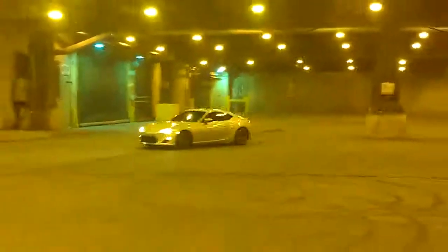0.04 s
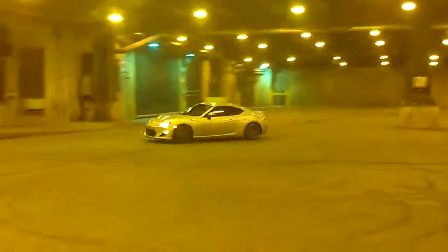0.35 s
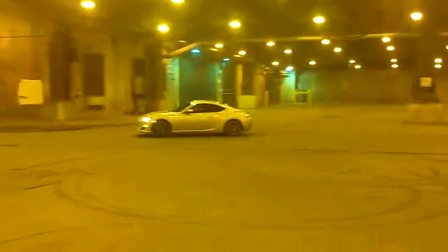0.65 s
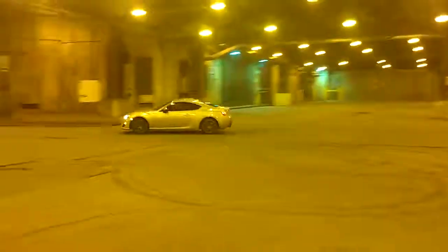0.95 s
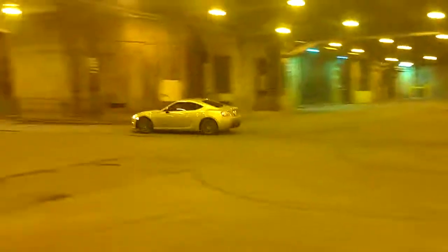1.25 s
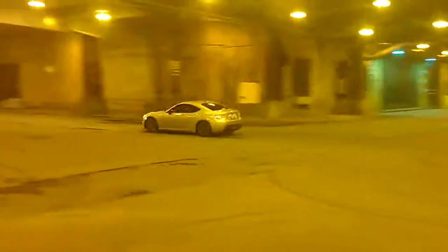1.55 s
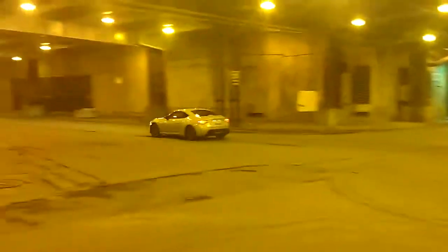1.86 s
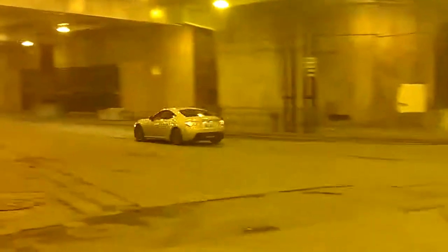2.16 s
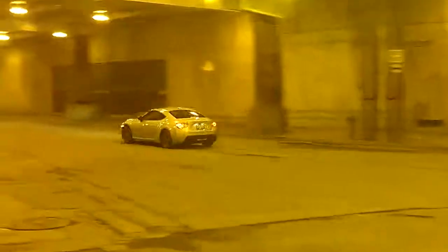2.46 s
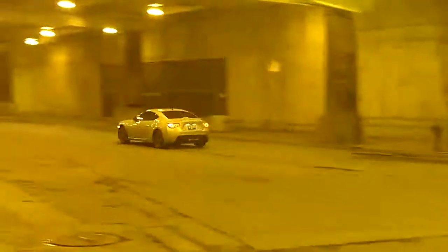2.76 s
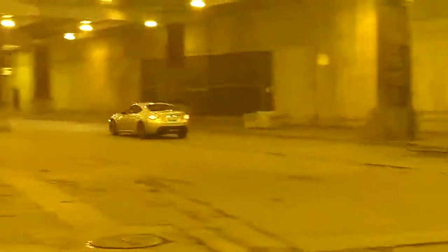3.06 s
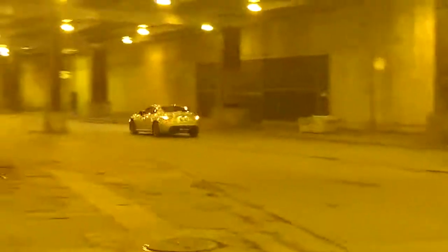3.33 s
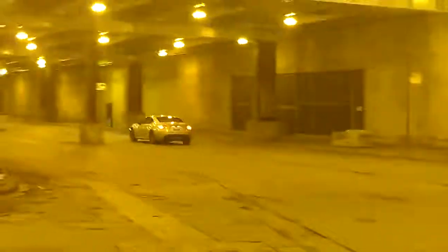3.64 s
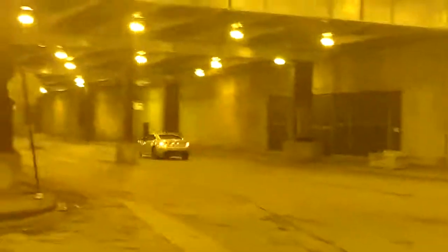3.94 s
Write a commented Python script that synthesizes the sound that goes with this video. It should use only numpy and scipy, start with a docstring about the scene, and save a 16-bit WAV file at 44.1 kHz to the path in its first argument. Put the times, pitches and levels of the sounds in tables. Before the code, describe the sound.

Echoing tyre squeal as a car drifts round and pulls away, its engine droning.

```python
"""A covered concrete street: a car drifts round and pulls away. The sliding tyres squeal in stick-slip
near 1 kHz, smeared into a band by the long echo, over the engine's firing drone and throbbing roar.
Twice a tyre bites hard, with a cluster of chirps and a faint bump. After the second bite the level
dips and a thinner, higher squeal goes on."""
import sys
import numpy as np
from scipy import signal
from scipy.fft import rfft, irfft, next_fast_len
from scipy.io import wavfile
from scipy.ndimage import uniform_filter1d, map_coordinates

SR = 44100
rng = np.random.default_rng(int(sys.argv[2]) if len(sys.argv) > 2 else 0)


def bounce(signal):
    """Save signal as a 16-bit WAV file at the path given by the first command-line argument."""
    frames = np.transpose(np.atleast_2d(signal))
    limited = np.clip(frames, -1, 1)
    pcm = np.round(limited * 32767).astype(np.int16)
    wavfile.write(sys.argv[1], SR, pcm)


N = 176400
LEAD_S = 1  # head start that fills the echo
JITTER_KNOTS_HZ = 260

# Street echo. Each row: frequency in Hz, time to decay 60 dB in seconds.
STREET_T60_S = [(150, 1), (1000, 2.82), (3000, 1.8), (8000, 0.49)]
# Engine loudness. Each row: time in seconds, relative level in dB.
ENGINE_DB = [(0.0, -53.5), (0.8, -43), (1.2, -50), (1.43, -43.5), (1.65, -46.5), (1.79, -41), (2.12, -36),
             (2.27, -49), (2.32, -41.5), (2.81, -40), (2.86, -32.5), (2.92, -38.5), (3.35, -31.5),
             (3.75, -31), (3.81, -57), (4.0, -41)]
# Engine speed. Each row: time in seconds, firing rate in Hz.
FIRING_HZ = [(0, 101.5), (.5, 108), (1.0, 119), (1.45, 109.7), (1.8, 102.4), (2.0, 111.7), (2.55, 118.5),
             (4, 119.4)]
# Exhaust tones. Each row: multiple of the firing rate, relative level in dB.
EXHAUST_ORDERS = [(1, -32.5), (2, -5), (3, -7), (4, -9), (5, -5), (6, 5.5), (7, 4)]
# Swells of the third exhaust tone. Each row: peak time in seconds, level in dB.
EXHAUST_BOOMS = [(2.57, -49.5), (2.85, -38.5), (3.34, -36), (3.6, -40.5)]
# Low thuds. Each row: peak time in seconds, rise and fall in seconds, level in dB.
THUDS = [(2.126, .02, -71.5), (3.768, .009, -33)]
# Noise spectra. Each row: frequency in Hz, relative density in dB.
ROAR_SPECTRUM = [(60, -63.5), (130, -41.5), (190, -17.5), (230, -16.5), (290, -4.5), (350, -1), (420, -6.5),
                 (540, -2.5), (700, 7), (900, 5.5), (1150, 10.5), (1400, -7), (1900, -1), (2800, -16.5),
                 (5000, -73)]
THUD_SPECTRUM = [(25, -5.5), (120, 8.5), (250, 4.5), (600, -42.5)]
SCRUB_SPECTRUM = [(200, -43.5), (600, -19.5), (850, 9.5), (1500, 3.5), (2400, 4), (2900, -5), (4400, -8),
                  (5200, -26.5), (6200, -53)]
RASP_SPECTRUM = [(150, -37.5), (400, -3.5), (750, 10.5), (1500, 7.5), (3500, 1), (7000, -9), (9500, -24.5)]
GRIT_SPECTRUM = [(2000, -25), (3800, 0.5), (7000, -15.5)]
# Last thin squeal. Each row: time in seconds, fundamental in dB, second harmonic in dB.
WHINE_DB = [(3.785, -31, -31.5), (3.815, -69, -43), (3.839, -51, -40), (3.875, -29, -29), (3.927, -27, -34),
            (3.987, -24.5, -26), (4.0, -23.5, -33)]
# Tread judder. Each row: time in seconds, level in dB.
JUDDER_DB = [(0, -54), (.06, -43.5), (.28, -39), (.32, -61), (.37, -39.5), (.62, -63), (.79, -40),
             (.86, -47), (1.08, -45.5), (1.34, -42.5), (1.75, -77.5)]
# Hardest single slips. Each row: peak time in seconds, pitch in Hz, level in dB.
TREAD_YIPS = [(.119, 1080, -37), (0.23, 1104, -40), (1.077, 1125, -36.5), (1.335, 1115, -33.5),
              (3.885, 1204, -41)]
# Tyre overtones. Each row: multiple of the pitch, relative level in dB.
JUDDER_HARMONICS = [(3, 2), (4, -1), (5, -10.5), (6, -14.5)]
CHIRP_HARMONICS = [(3, -7), (4, -12.5)]
SQUEAL_HARMONICS = [(3, 11.5), (4, 6.5), (5, -22)]
# Tyre bites. Each row: peak time in seconds, pitch in Hz, rise and fall in seconds,
# fundamental, second harmonic and rasp in dB, rasp cutoff in Hz.
BITES = [(2.084, 930, .007, .012, -17.5, -18, -40.5, 4340),
         (2.117, 1008, 0.014, 0.012, -14.5, -13.5, -23.5, 4920),
         (2.137, 1006, .005, 0.024, -15, -17.5, -27, 4500),
         (2.297, 1123, .006, 0.0089, -29, -28.5, -46, 4500),
         (2.337, 1002, 0.0071, .016, -14.5, -30.5, -36, 4400),
         (2.603, 1028, 0.014, 0.014, -11.5, -35.5, -41, 3503),
         (3.755, 1225, 0.0088, 0.0059, -13.5, -9, -20.5, 9200),
         (3.768, 1176, 0.0042, 0.0082, -11.5, -18, -19.5, 9300)]
# Sliding tyres. Each row: ratio to the common pitch, relative level in dB.
TYRE_VOICES = [(1.0, -1), (1.07, -5.5), (.93, -7.5)]
# Squeal pitch. Each row: time in seconds, second harmonic in Hz.
SQUEAL_OCTAVE_HZ = [(0, 2137), (.3, 2164), (.37, 1979), (.55, 2030), (.74, 2271), (.91, 2250), (.96, 2067),
                    (1.08, 2285), (1.3, 2247), (1.58, 2124), (1.74, 1897), (2.0, 1849), (2.27, 2091),
                    (3.7, 2123)]
# Squeal fundamental. Each row: time in seconds, relative level in dB.
SQUEAL_DB = [(0.0, -32.5), (0.11, -25), (0.23, -25), (0.26, -20), (0.31, -27.5), (0.42, -21.5),
             (0.51, -28.5), (0.56, -20), (0.68, -24.5), (0.8, -19), (0.84, -23.5), (0.99, -20.5),
             (1.14, -29.5), (1.31, -23), (1.62, -21), (1.7, -25), (1.78, -20.5), (2.0, -21.5), (2.17, -25),
             (2.27, -34.5), (2.37, -27.5), (2.57, -23), (2.66, -27.5), (2.82, -30.5), (2.84, -19),
             (2.99, -29), (3.02, -19), (3.11, -28.5), (3.16, -21.5), (3.58, -31), (3.63, -17), (3.72, -46)]
# Squeal brightness. Each row: time in seconds, second harmonic and treble in relative dB.
SQUEAL_EDGE_DB = [(0.0, -33.5, -47), (0.13, -26.5, -43.5), (0.69, -30.5, -42), (0.77, -26.5, -35.5),
                  (0.85, -30.5, -44), (0.96, -31, -37.5), (1.17, -34, -46), (1.31, -31.5, -42.5),
                  (1.63, -31.5, -43.5), (1.7, -37, -50.5), (1.78, -31.5, -45.5), (2.04, -39, -47.5),
                  (2.24, -36, -47.5), (2.5, -41, -54), (2.596, -36, -49.5), (2.648, -46.5, -59),
                  (2.89, -35.5, -47.5), (2.936, -43.5, -53.5), (3.092, -42.5, -48.5), (3.596, -45.5, -41.5),
                  (3.72, -51, -43.5)]


def amp(db):
    """Decibels to gain."""
    return 10 ** (np.asarray(db) / 20)


def unit(x):
    """Scale to rms 1."""
    return x / np.sqrt(np.mean(x ** 2) + 1e-20)


def along(points, hz):
    """Interpolate (Hz, value) points on a log axis."""
    knots_hz, values = np.transpose(points)
    return np.interp(np.log(hz + 1), np.log(knots_hz + 1), values)


def clock(lead_s=0):
    """Sample times in seconds, from -lead_s."""
    return np.arange(-lead_s * SR, N) / SR


def curves(rows, lead_s=0):
    """One value per sample for each column after the time."""
    times_s, *columns = np.transpose(rows)
    return [np.interp(clock(lead_s), times_s, column) for column in columns]


def wobble(knots_hz, size=N):
    """Smooth random curve."""
    return map_coordinates(rng.standard_normal(8192), [np.arange(size) * knots_hz / SR + 2], mode="mirror")


def swell(peak_s, rise_s, fall_s):
    """Rounded peak with exponential flanks."""
    t = clock() - peak_s
    return np.exp(1 - np.hypot(1, np.pi / 2 * t / np.where(t < 0, rise_s, fall_s)))


def filtered(x, response):
    """Apply a gain given as a function of Hz."""
    size = next_fast_len(N + SR // 2)
    return irfft(rfft(x, size) * response(np.fft.rfftfreq(size, 1 / SR)), size)[:N]


def lowpass(cutoff_hz, order):
    """Butterworth gain as a function of Hz."""
    return lambda hz: 1 / np.hypot(1, (hz / cutoff_hz) ** order)


def noise(spectrum):
    """Coloured noise of rms 1."""
    return unit(filtered(rng.standard_normal(N), lambda hz: amp(along(spectrum, hz))))


def cycle(hz, jitter, knots_hz=JITTER_KNOTS_HZ):
    """Phase of an oscillation whose pitch trembles by the fraction jitter."""
    return 2 * np.pi * np.cumsum(hz * (1 + jitter * wobble(knots_hz, len(hz)))) / SR


def tones(rows, phase):
    """Harmonics of one oscillation from (multiple, dB rms) rows."""
    return np.sqrt(2) * sum(amp(db) * np.sin(round(k) * phase) for k, db in rows)


def echo(x):
    """Concrete reverberation, longest near 1 kHz, shortest in the treble."""
    hz, t, spectra = signal.stft(rng.standard_normal(SR * 3 // 2), SR, nperseg=256)
    decay = np.exp(-np.log(1000) * t / along(STREET_T60_S, hz)[:, None])
    tail = signal.istft(spectra * decay, SR, nperseg=256)[1]
    return signal.fftconvolve(x, tail / np.linalg.norm(tail))[:len(x)]


def distant(x, direct_db):
    """Echo plus weaker direct sound, held at rms 1."""
    mix = unit(echo(x)) + amp(direct_db) * unit(x)
    power = np.abs(uniform_filter1d(mix * mix, size=4000))
    return (mix / np.sqrt(power + 1e-9))[-N:]


def engine():
    """Uneven firing drives exhaust tones and a throbbing roar; under load the tones gain and boom."""
    throttle_s, throttle_rise_s, load_db = 2.39, 0.89, 3
    level_db, = curves(ENGINE_DB)
    firing_hz, = curves(FIRING_HZ, LEAD_S)
    load = np.clip((clock() - throttle_s) / throttle_rise_s, 0, 1)
    phase = cycle(firing_hz, jitter=0.0279, knots_hz=30)
    drone = amp(-4 + load_db * load) * distant(tones(EXHAUST_ORDERS, phase), direct_db=-6.5)
    throb = 1 + 0.21 * np.sin(phase[-N:])
    roar = amp(9) * unit(noise(ROAR_SPECTRUM) * throb)
    boom = sum(amp(db) * swell(s, rise_s=.047, fall_s=.047) for s, db in EXHAUST_BOOMS)
    return amp(level_db) * (drone + roar) + boom * unit(np.sin(3 * phase[-N:]))


def bumps():
    """Low thud under the hardest bites."""
    return sum(amp(db) * swell(s, flank_s, flank_s) for s, flank_s, db in THUDS) * noise(THUD_SPECTRUM)


def whine():
    """One tyre sings on at a higher, steadier pitch."""
    start_s, rise_s, pitch_hz = 3.77, 0.0047, 1245
    first_db, second_db = curves(WHINE_DB)
    phase = cycle(np.full(N + LEAD_S * SR, pitch_hz), jitter=0.041)
    levels_db = [first_db, second_db, second_db - 17.5, second_db - 34]
    tone = sum(amp(db) * distant(np.sin(k * phase), direct_db=-2.5) for k, db in enumerate(levels_db, 1))
    scrub = amp(second_db - 9.5) * noise(SCRUB_SPECTRUM)
    return np.clip((clock() - start_s) / rise_s, 0, 1) * (tone + scrub)


def judder():
    """The tread lets go in quick uneven slips that ring on the squeal's overtones; a few yip out."""
    slip_hz, sharpness = 60, 0.9
    level_db, = curves(JUDDER_DB)
    octave_hz, = curves(SQUEAL_OCTAVE_HZ)
    grit = amp(-6.5) * noise(GRIT_SPECTRUM)

    def ring(hz):
        return unit(unit(tones(JUDDER_HARMONICS, cycle(hz, jitter=.031))) + grit)

    slip_phase = cycle(np.full(N, slip_hz), jitter=.3, knots_hz=54)
    slips = np.exp(sharpness * np.cos(slip_phase) + 0.85 * np.tanh(wobble(knots_hz=40)))
    yips = sum(amp(db) * swell(s, rise_s=.0082, fall_s=.0082) * ring(np.full(N, hz))
               for s, hz, db in TREAD_YIPS)
    return amp(level_db) * unit(slips * ring(octave_hz / 2)) + yips


def chirps():
    """A tyre bites in short rasping yelps; the street echoes their tone."""
    flutter_db, echo_db = 1.54, -17
    tone, edge = np.zeros(N), np.zeros(N)
    for peak_s, hz, rise_s, fall_s, first_db, second_db, rasp_db, cutoff_hz in BITES:
        bite = swell(peak_s, rise_s, fall_s)
        phase = cycle(np.full(N, hz), jitter=.036, knots_hz=540)
        flutter = amp(flutter_db * wobble(JITTER_KNOTS_HZ))
        tone += bite * flutter * tones([(1, first_db), (2, second_db)], phase)
        rasp = noise(RASP_SPECTRUM) + tones(CHIRP_HARMONICS, phase)
        edge += bite * amp(rasp_db) * filtered(rasp, lowpass(cutoff_hz, order=8))
    return tone + edge + amp(echo_db) * echo(tone)


def slide():
    """Tyres stick and slip at slightly different, wandering pitches and scrub on the concrete."""
    howl_ratio, howl_db, howl_rise_s = .9, -4.5, 0.94
    end_s, fade_db_per_s = 3.76, 509
    pitch_hz = curves(SQUEAL_OCTAVE_HZ, LEAD_S)[0] / 2
    first_db, = curves(SQUEAL_DB)
    second_db, treble_db = curves(SQUEAL_EDGE_DB)
    tyres = []
    for ratio, db in TYRE_VOICES:
        wander = 1 + .028 * wobble(knots_hz=22, size=len(pitch_hz))
        tyres.append((amp(db), cycle(pitch_hz * ratio * wander, jitter=.026)))

    def harmonic(k):
        return sum(gain * np.sin(k * phase) for gain, phase in tyres)

    overtones = sum(amp(db) * harmonic(round(k)) for k, db in SQUEAL_HARMONICS)
    # A ragged howl builds just below the squeal as the car swings round.
    howl_gain = amp(howl_db) * np.clip(clock(LEAD_S) / howl_rise_s, 0, 1)
    howl = howl_gain * np.sin(cycle(pitch_hz * howl_ratio, jitter=0.1, knots_hz=90))
    chatter_db = 2.5 * wobble(knots_hz=55)  # rubber grabbing
    first = amp(first_db + 0.5) * distant(harmonic(1) + howl, direct_db=-8)
    second = amp(second_db + 3.5) * distant(harmonic(2), direct_db=-0.5)
    treble = amp(treble_db - 4.5 + chatter_db) * distant(overtones, direct_db=-0.5)
    scrub = amp(treble_db + 8.5) * noise(SCRUB_SPECTRUM)
    fade = amp(-fade_db_per_s * np.maximum(clock() - end_s, 0))
    return fade * (first + second + treble + scrub)


def scene():
    """Tyres and engine in mono; squeals, judder and engine are band-limited to about 165-6100 Hz."""
    low_cut_hz, high_cut = 165, lowpass(cutoff_hz=6100, order=20)
    sustained = slide() + judder() + whine() + engine()
    banded = filtered(sustained, lambda hz: high_cut(hz) / np.hypot(1, (low_cut_hz / (hz + 1)) ** 5))
    return (banded + chirps() + bumps())[None]


def record(dry):
    """Clip the loudest peaks, then low-pass steeply."""
    ceiling = .72
    clipped = dry[0] / (1 + np.abs(dry[0] / ceiling) ** 30) ** (1 / 30)
    return filtered(clipped, lowpass(cutoff_hz=9755, order=40))[None]


dry = scene()
out = record(dry)
bounce(out)
```